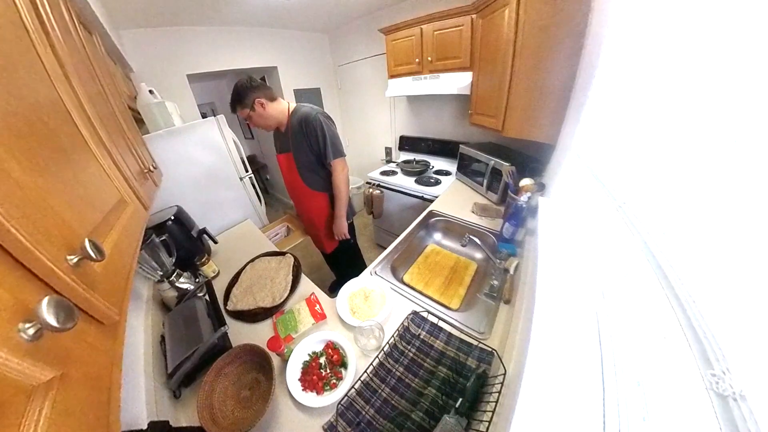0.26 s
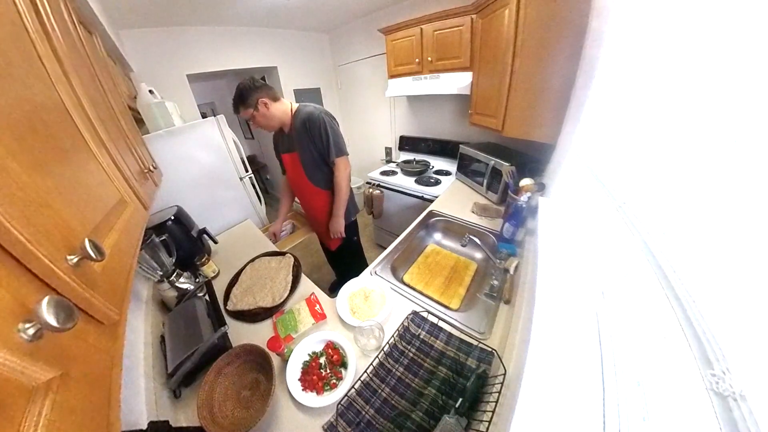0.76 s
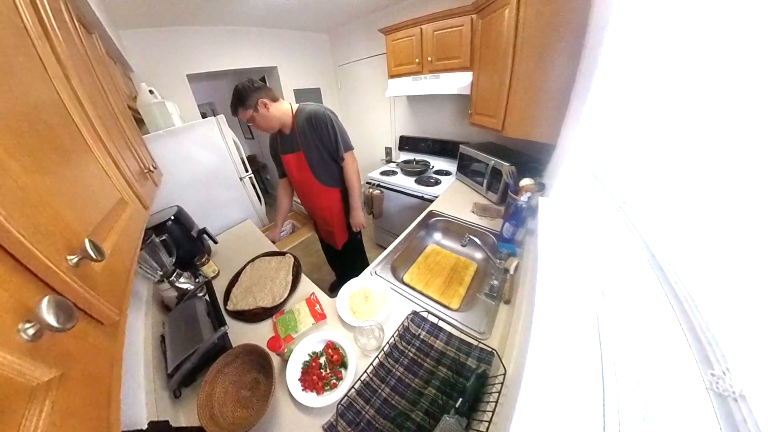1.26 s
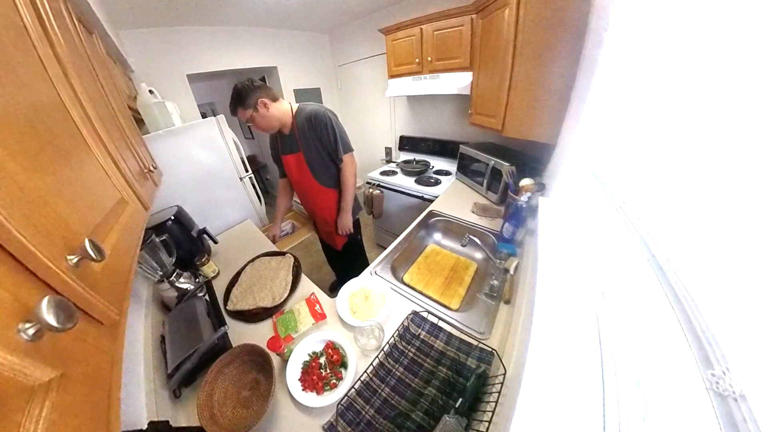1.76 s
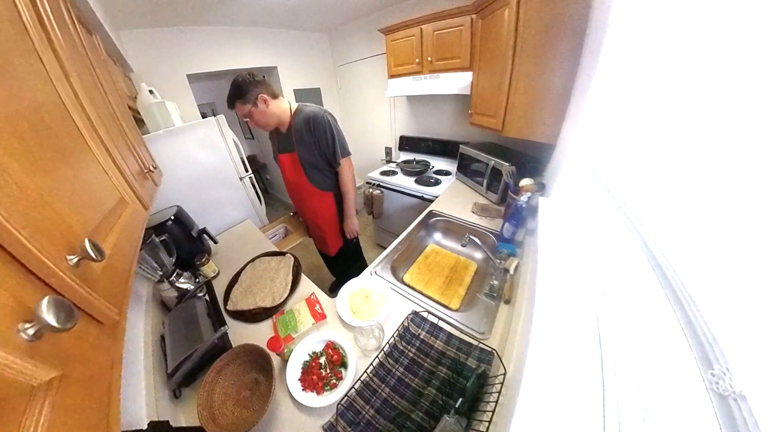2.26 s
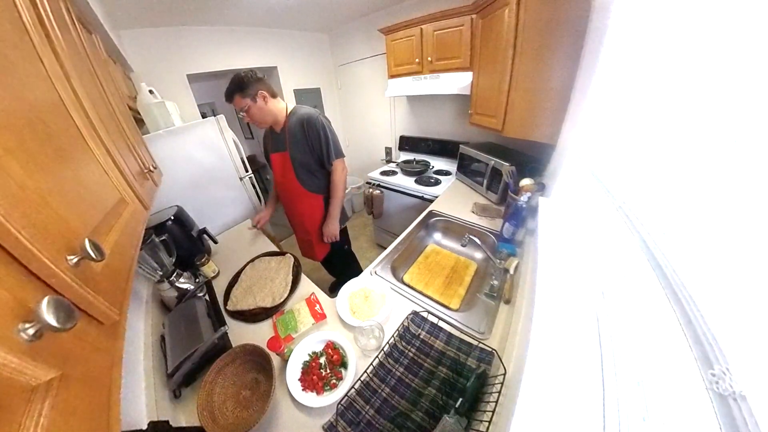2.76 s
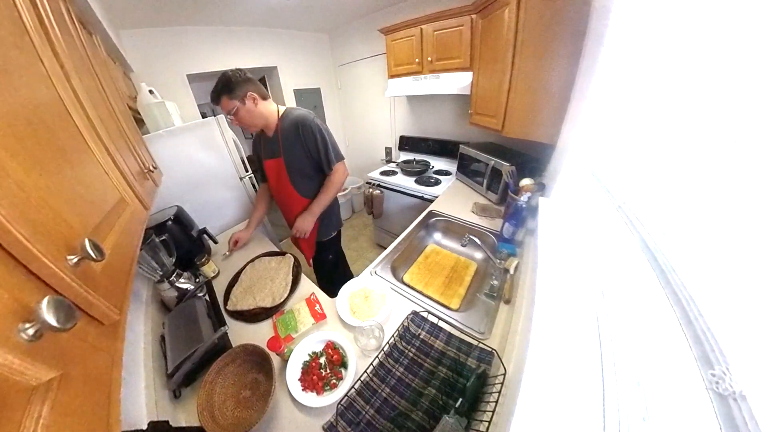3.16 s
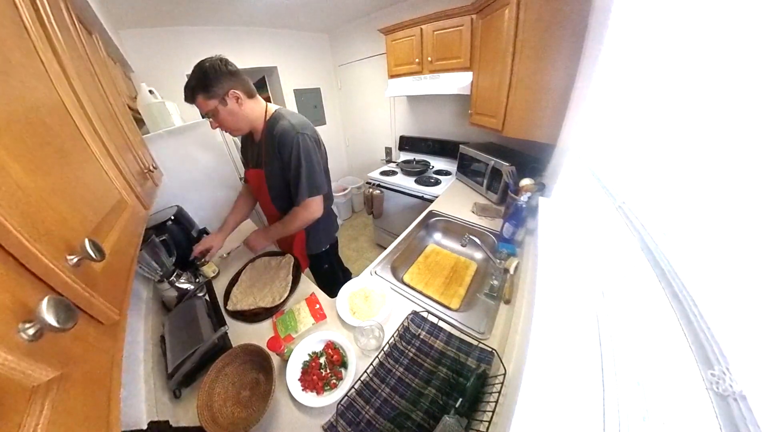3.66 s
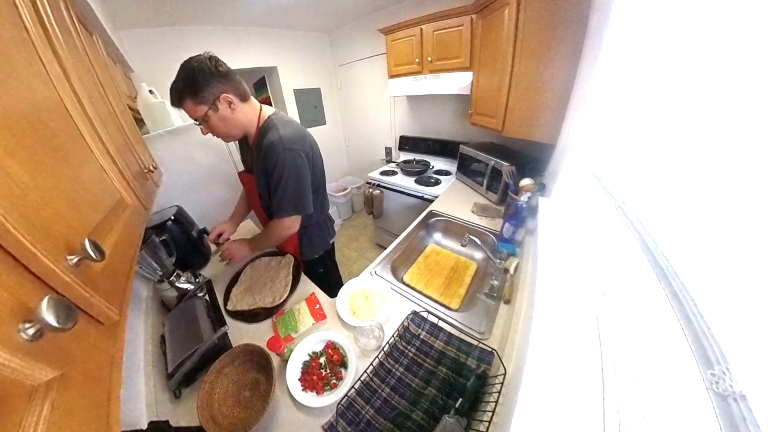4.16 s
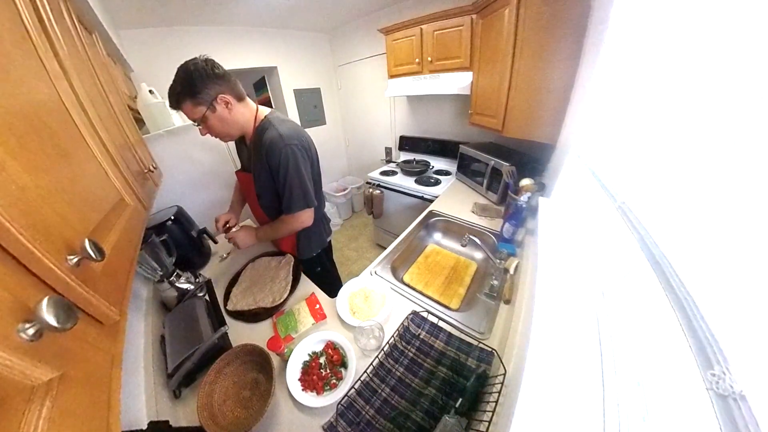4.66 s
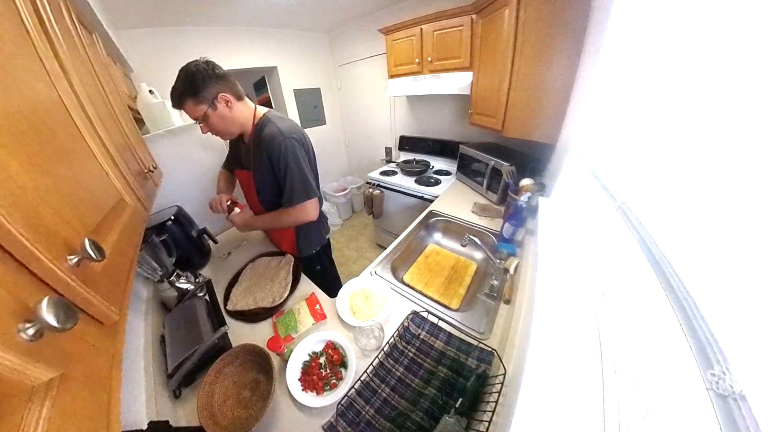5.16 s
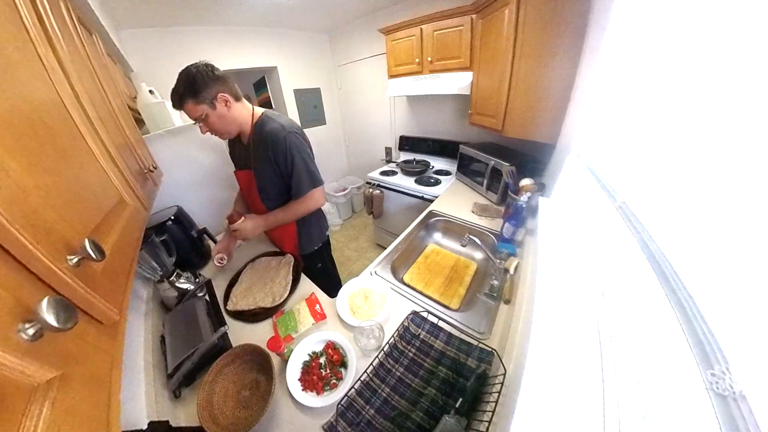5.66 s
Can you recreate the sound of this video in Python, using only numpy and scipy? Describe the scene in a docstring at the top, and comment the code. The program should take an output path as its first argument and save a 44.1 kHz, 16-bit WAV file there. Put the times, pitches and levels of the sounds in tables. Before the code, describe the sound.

Close, slightly hissy microphone in a small reflective kitchen. Quiet wood rubbing and knocks come first, then sparse bright cutlery clinks, a pause, and a second drawer slide ending in a hollow wooden thud. Straight after, a spoon hits the counter in a rapid burst of hard knocks and metallic ringing, with a thin glass note. Two dull bumps follow, then a short hollow lid pop over steady fridge hum.

```python
"""In a small hard kitchen a cutlery drawer slides, a hand picks a spoon out with a few clinks, and the drawer
slides shut with a boom. The spoon drops on the counter, where it knocks, rattles and rings, and jolts a glass jar.
The jar is lifted and its lid pops open. All along, a fridge hums over the hiss of the microphone.
Knocks and rubbing are filtered noise or clicks, ringing is fading sines, and the hum is sines of steady pitch,
all but the lowest wavering in level."""
import sys
import numpy as np
from scipy import signal
from scipy.fft import rfft, irfft, next_fast_len
from scipy.io import wavfile

SR = 44100
rng = np.random.default_rng(int(sys.argv[2]) if len(sys.argv) > 2 else 0)


def generate_wav(signal):
    """Clip the signal to [-1, 1] and save it as 16-bit WAV at the path in sys.argv[1]."""
    frames = np.transpose(np.atleast_2d(signal))
    scaled = np.clip(frames, -1, 1) * 32767
    pcm = np.round(scaled).astype(np.int16)
    wavfile.write(sys.argv[1], SR, pcm)


N = 260631   # length [samples]


def amp(db):
    """Turn decibels into a plain factor."""
    return 10 ** (np.asarray(db, float) / 20)


def rms_one(x):
    """Scale a sound to an average strength (rms) of 1."""
    return x / np.sqrt(np.mean(x ** 2) + 1e-20)


def at_hz(points, hz):
    """Read a table of (frequency, value) at any pitch, with straight lines over log frequency."""
    table_hz, values = np.array(points).T
    return np.interp(np.log(hz), np.log(table_hz), values)


def band(x, low_hz, high_hz, order=2):
    """Keep mainly the pitches between two limits."""
    sos = signal.butter(order, [low_hz, high_hz], "band", fs=SR, output="sos")
    return signal.sosfilt(sos, x + 1e-18)


def colour(x, spectrum, size=8192):
    """Causal (minimum-phase) filter with this spectrum's shape; white noise keeps its rms."""
    hz = np.maximum(np.arange(size // 2 + 1), .5) * SR / size
    log_gain = np.log(amp(at_hz(spectrum, hz)))
    # folding the cepstrum puts the response as early as it can be
    cepstrum = irfft(log_gain)
    cepstrum[1:size // 2] *= 2
    cepstrum[size // 2 + 1:] = 0
    response = irfft(np.exp(rfft(cepstrum)))
    response = response / np.sqrt(np.sum(response ** 2))
    return signal.fftconvolve(x, response)[:N]


def ring(x, hz, t60):
    """A unit click sets a sine of height 1 ringing; it falls by 60 dB in t60 seconds."""
    r, w = amp(-60 / (t60 * SR)), 2 * np.pi * hz / SR
    return signal.lfilter([0, np.sin(w)], [1, -2 * r * np.cos(w), r * r], x + 1e-18)


def grit(spread_db):
    """Dense micro-contacts of uneven size; rms 1."""
    uneven_db = spread_db * np.minimum(rng.exponential(1, N), 4)
    return rms_one(rng.standard_normal(N) * amp(uneven_db))


def contacts(seconds, db, length_s, rise_s):
    """Envelope of touches that swell over their rise and fade over their length."""
    t, out = np.arange(N) / SR, np.zeros(N)
    lengths, rises = np.clip(length_s, .0005, .1), np.clip(rise_s, .0001, .05)
    for s, gain, length, rise in zip(seconds, amp(db), lengths, rises):
        span = slice(round(s * SR), round((s + 8 * length + rise) * SR))
        age = np.maximum(t[span] - s, 0)
        out[span] += gain * (1 - np.exp(-age / rise)) * np.exp(-age / length)
    return out


def click(s, db):
    """Single-sample blows at the given times."""
    out = np.zeros(N)
    np.add.at(out, np.round(np.multiply(s, SR)).astype(int), amp(db))
    return out


def three_bands():
    """Grit as heard through the cabinet: thump, wooden middle, tick."""
    rough = grit(spread_db=1.0)
    thump = band(rough, low_hz=146, high_hz=370)
    wood = band(rough, low_hz=502, high_hz=1570, order=4)
    tick = band(rough, low_hz=2440, high_hz=5720, order=3)
    return rms_one(thump), rms_one(wood), rms_one(tick)


# the spoon lands again and again: (time [s], knock strength [dB], spoon ring strength [dB])
LANDINGS = [(3.309, -1.5, -61), (3.345, 0.5, -62.5), (3.368, 11, -28.5), (3.383, 1.5, -30),
            (3.398, -20, -33.5), (3.437, 5.5, -39), (3.46, -8, -44), (3.48, -3.5, -44.5),
            (3.501, -3.5, -48.5), (3.522, -2.5, -49), (3.55, -17, -55.5), (3.587, -28, -69)]
# chatter as the spoon rocks on the counter: (time [s], strength [dB])
ROCKING = [(3.311, -19), (3.325, -31), (3.364, -28), (3.369, -7.5), (3.374, -21), (3.502, -26),
           (3.578, -45.5)]
# tone of the counter when knocked: (frequency [Hz], relative level [dB per Hz])
COUNTER = [(40, -54), (110, -18), (250, -11.5), (430, -8.5), (950, 2), (1400, -2), (2500, -19.5),
           (3100, -20), (5000, -34), (9000, -56.5), (16000, -56.5)]
# the spoon's ringing modes: (frequency [Hz]), and in the same order (level [dB], t60 [s])
SPOON_HZ = [3101, 4032, 5452, 7330, 7957, 9600, 9760, 12960]
SPOON_MODES = [(0, 0.0582), (0.5, 0.42), (0.5, 0.16), (-11, 0.13), (-6.5, 0.23), (-5.5, 0.081), (-22, 0.1),
               (-15, 0.073)]
# the crack grows with the knock and with the ring [dB per dB]
CRACK_DB, CRACK_WITH_KNOCK, CRACK_WITH_RING = -34, 1.22, 0.36


def spoon():
    """Each landing knocks the counter, cracks and strikes the spoon's modes; as it rocks it chatters."""
    s, knock_db, ring_db = np.transpose(LANDINGS)
    when, level = np.transpose(ROCKING)
    chatter_db = np.interp(np.arange(N) / SR, when, level, left=-150, right=-150)
    chatter = grit(spread_db=4.5) * amp(chatter_db)
    knocks = colour(click(s, knock_db) + chatter, COUNTER)

    each = np.ones(len(s))
    crack_db = CRACK_DB + CRACK_WITH_KNOCK * knock_db + CRACK_WITH_RING * ring_db
    touches = contacts(s, crack_db, length_s=0.0098 * each, rise_s=.0003 * each)
    cracks = band(grit(spread_db=11.5) * touches, low_hz=2527, high_hz=14000)

    # every landing strikes the modes a little differently
    chance_db = rng.normal(0, 0.89, (len(s), len(SPOON_MODES)))
    rings = 0
    for k, (hz, (mode_db, t60)) in enumerate(zip(SPOON_HZ, SPOON_MODES)):
        rings = rings + ring(click(s, ring_db + mode_db + chance_db[:, k]), hz, t60)
    return knocks + cracks + rings


# the nearby glass jar is jolted: (time [s], level [dB])
JOLTS = [(3.368, -41), (3.437, -51), (3.585, -50)]


def jolted_jar():
    """Each jolt sets one clear note of the glass ringing."""
    return ring(click(*np.transpose(JOLTS)), hz=4420, t60=0.82)


# the drawer front meets the cabinet and bounces: (time [s], strength [dB])
SHUT = [(2.951, -23), (2.972, -21), (2.99, -27), (3.014, -39.5)]
# tone of the wooden rattle: (frequency [Hz], relative level [dB per Hz])
CABINET = [(30, -45), (100, -1.5), (300, 1.5), (560, -12.5), (950, -4), (1500, -13), (3000, -27),
           (7000, -40), (15000, -50)]
# cabinet panel modes: (frequency [Hz]), and in the same order (level [dB], t60 [s])
PANELS_HZ = [84, 205, 255, 380]
PANEL_MODES = [(-2, 0.21), (-3, 0.071), (-2, 0.084), (-6.5, 0.054)]
# the cutlery set ringing: (frequency [Hz], level [dB], t60 [s])
SHIVER = [(4600, -56.5, .2), (5160, -61, 0.16), (5450, -58, .15), (6940, -58, 0.17)]
SHIVER_S = 3.015   # when the cutlery starts to ring
SHUT_CONTACT_S, SHUT_RISE_S = 0.0098, 0.0031
SEATED_S, SEATED_DB = 2.985, -21   # the front seats fully and sets off the deepest panel


def drawer_shuts():
    """The cabinet panels boom under a wooden rattle; the cutlery shivers just after."""
    s, db = np.transpose(SHUT)
    each = np.ones(len(s))
    touches = contacts(s, db, SHUT_CONTACT_S * each, SHUT_RISE_S * each)
    rattle = colour(grit(spread_db=2.5) * touches, CABINET)

    boom = 0
    for hz, (mode_db, t60) in zip(PANELS_HZ, PANEL_MODES):
        deepest = hz == min(PANELS_HZ)
        blows = click([SEATED_S], SEATED_DB) if deepest else click(s, db)
        boom = boom + amp(mode_db) * ring(blows, hz, t60)
    boom = band(boom, low_hz=60.4, high_hz=427)   # a soft blow

    shiver = sum(ring(click([SHIVER_S], level), hz, t60) for hz, level, t60 in SHIVER)
    return rattle + boom + shiver


# cutlery clinking in the drawer:
# (time [s], clink [dB], tray knock [dB], scratch [dB], ring strength [dB], rise of the metal touch [s])
CLINKS = [(1.097, -60, -54, -59, -97, 0.0027), (1.133, -42.5, -45, -41.5, -90, 0.0026),
          (1.366, -56, -54, -53, -95, .004), (1.387, -32.5, -36.5, -45, -67, 0.0015),
          (1.534, -46, -34.5, -57, -74, 0.0041), (1.546, -26, -36, -33.5, -49.5, 0.0036),
          (1.558, -23.5, -29.5, -31.5, -52.5, 0.0053), (2.568, -49, -45, -41.5, -81, 0.00089)]
# the cutlery's common modes: (frequency [Hz]), and in the same order (level [dB], t60 [s])
CUTLERY_HZ = [3670, 4440, 5290, 6280, 7020, 8020, 9600, 11100, 12300, 12800, 13000, 13400, 14600]
CUTLERY_MODES = [(-36, .02), (-24, 0.018), (-3, 0.032), (3.5, 0.035), (-3.5, 0.094), (-3.5, 0.026),
                 (-5, 0.083), (-4, 0.056), (-13, 0.032), (0, 0.031), (4, 0.042), (-12, .05), (-1, 0.046)]
# tone of the bright clink, then of the tray below: (frequency [Hz], relative level [dB per Hz])
CLINK_TONE = [(3000, -18.5), (5500, -4.5), (7000, 4.5), (10500, -1.5), (13200, 3), (15200, 0), (16500, -34)]
TRAY_TONE = [(88, -56), (150, -31.5), (414, -14), (716, -12.5), (920, -5.5), (1290, -15), (1500, -13.5),
             (2600, -25.5), (3380, -46), (5720, -120)]
JOSTLE_S, TRAY_S = 0.015, 0.028   # fading of the touches on metal and on the tray
TRAY_SLOWER = 2.8   # the tray's rise takes this many times longer


def cutlery():
    """Forks and spoons jostle: bright grit, a duller scratch, their common modes, and the tray below."""
    s, clink_db, tray_db, scratch_db, ring_db, rise = np.transpose(CLINKS)
    length = JOSTLE_S * np.ones(len(s))
    rough = grit(spread_db=6.0)

    # every clink excites the modes a little differently
    chance_db = rng.normal(0, 1.2, (len(s), len(CUTLERY_MODES)))
    rings = 0
    for k, (hz, (mode_db, t60)) in enumerate(zip(CUTLERY_HZ, CUTLERY_MODES)):
        push = contacts(s, ring_db + mode_db + chance_db[:, k], length, rise)
        rings = rings + ring(rough * push, hz, t60)

    bright = colour(rough * contacts(s, clink_db, length, rise), CLINK_TONE)
    scratch_grit = rms_one(band(rough, low_hz=3200, high_hz=6670))
    scratch = scratch_grit * contacts(s, scratch_db, length, rise)
    tray_touches = contacts(s, tray_db, TRAY_S * np.ones(len(s)), TRAY_SLOWER * rise)
    tray = colour(grit(spread_db=0.0) * tray_touches, TRAY_TONE)
    return rings + bright + scratch + tray


# the lid lets go: (time [s], strength [dB])
POP = [(5.035, -5)]
# the lid's modes: (frequency [Hz]), and in the same order (level [dB], t60 [s])
LID_HZ = [930, 923, 956, 1740]
LID_MODES = [(0.5, 0.0094), (-23.5, 0.13), (-24.5, 0.16), (-18.5, 0.027)]
# tone of the short hiss: (frequency [Hz], relative level [dB per Hz])
SNAP = [(50, -19), (150, -12.5), (330, -29), (600, -17), (900, -18), (1400, -6.5), (1900, 1), (2450, -26.5),
        (3100, -12), (4200, -12.5), (5200, -20), (6200, -16), (6750, -25.5), (7500, -22.5), (16000, -40)]
SNAP_DB = -3   # hiss strength against the pop strength


def lid_pop():
    """Air rushes in through the neck, so the note swells over its first cycles; the lid's close modes beat."""
    (s, db), = POP
    inrush = amp(-20) * ring(click([s], db), hz=940, t60=.012)
    note = sum(amp(mode_db) * ring(inrush, hz, t60) for hz, (mode_db, t60) in zip(LID_HZ, LID_MODES))
    hiss = rng.standard_normal(N) * contacts([s], [db + SNAP_DB], length_s=[.006], rise_s=[.0008])
    return band(note, low_hz=610, high_hz=5010) + colour(hiss, SNAP)


# two slides of the drawer on its runners, each a list of:
# (time [s], wood scrape level [dB], gritty treble above the scrape [dB])
SLIDES = [
    [(0.0, -46.5, -14), (0.05, -50.5, -22), (0.116, -60.5, -6), (0.13, -52.5, -3), (0.24, -58, -18),
     (0.374, -64, -16), (0.432, -60.5, -9), (0.6, -87, -20)],
    [(2.1, -78, -8), (2.27, -70, -9), (2.472, -48, -20), (2.536, -63, -20), (2.586, -48.5, -5),
     (2.762, -56, -18), (2.94, -59, -12)],
]
RUMBLE_DB = -56.5   # at the loudest point of each scrape
RUMBLE_FOLLOWS = 0.35   # the cabinet rumbles along, taking up this share of the scrape's swing in dB


def drawer_slides():
    """Wood rubs on wood while the drawer moves."""
    thump, wood, tick = three_bands()
    t, out = np.arange(N) / SR, 0
    for rows in SLIDES:
        s, db, high_db = np.transpose(rows)
        level, high = np.interp(t, s, db), np.interp(t, s, high_db)
        moving = (t >= s[0]) * np.clip((s[-1] - t) / .03, 0, 1)   # fades out over the last 0.03 s
        scrape = amp(level) * (wood + amp(high) * tick)
        rumble = amp(RUMBLE_DB + RUMBLE_FOLLOWS * (level - db.max())) * thump
        out = out + moving * (scrape + rumble)
    return out


# small bumps of drawer, hand and jar:
# (time [s], knock strength [dB], tick above the knock [dB], weight above the knock [dB])
BUMPS = [(0.0, -48.5, -21, 11), (0.126, -37, -30, -16), (0.177, -43, -11.5, -7), (0.38, -54, -18, 3),
         (1.138, -54.5, -19, 2), (1.298, -49.5, -14, -16), (1.783, -46, -12.5, -6),
         (2.169, -54.5, -11, -14), (2.312, -51, -6, -5), (2.433, -44.5, -22, -2.5), (2.571, -38.5, -17, -9),
         (2.862, -48.5, -24, 3), (3.814, -50.5, -42, 13), (3.874, -48.5, -30, 13)]
BUMP_CONTACT_S, BUMP_RISE_S = 0.02, 0.0043
THUMP_UNDER_DB = -5.5   # thump against the deep boom


def bumps():
    """Each bump shakes the wood and ticks; the more weight it has, the more it thumps and booms."""
    thump, wood, tick = three_bands()
    boom = rms_one(band(rng.standard_normal(N), low_hz=105.4, high_hz=135.6))
    s, db, tick_db, weight_db = np.transpose(BUMPS)
    each = np.ones(len(s))
    layers = [(wood, 0), (thump, weight_db + THUMP_UNDER_DB), (tick, tick_db), (boom, weight_db)]
    out = 0
    for layer, rel_db in layers:
        out = out + layer * contacts(s, db + rel_db, BUMP_CONTACT_S * each, BUMP_RISE_S * each)
    return out


# how fast the echoes die away: (frequency [Hz], t60 [s])
KITCHEN = [(100, .2), (300, 0.33), (1000, 0.29), (3000, 0.3), (6000, 0.26), (14000, 0.17)]
# single echoes off near cupboards: (delay [ms])
EARLY_MS = [2.3, 4.1, 6.7, 9.2, 11.9]
# echoes circling between the walls: (time for one round [ms])
ROUNDS_MS = [14.9, 17.9, 20.3, 22.9, 26.1, 29.3, 32.7, 36.1, 38.3, 40.7, 44.3, 48.9, 53.1, 57.7]
# smearing by rough surfaces: (delay [ms])
SCATTER_MS = [1.3, 2.9, 5.3]
CIRCLING_DB, EARLY_DB = 0.07, -13   # circling paths taken together, and each single echo


def kitchen(x):
    """Direct sound, single echoes off near cupboards, and echoes that circle between the walls losing treble."""
    size = next_fast_len(N + SR)
    hz = np.maximum(np.arange(size // 2 + 1), 1) * SR / size

    def late(ms):
        """A delay, written as a turn of phase at each frequency."""
        return np.exp(-2j * np.pi * hz * ms / 1000)

    echoes = amp(EARLY_DB) * sum((-1) ** k * late(ms) for k, ms in enumerate(EARLY_MS))
    share = amp(CIRCLING_DB) / np.sqrt(len(ROUNDS_MS))
    for k, ms in enumerate(ROUNDS_MS):
        once = amp(-60 * ms / 1000 / at_hz(KITCHEN, hz)) * late(ms)
        echoes = echoes + share * (-1) ** k * once / (1 - once)   # the sum of endless rounds
    for ms in SCATTER_MS:   # rough surfaces smear every echo
        echoes = echoes * (late(ms) - .6) / (1 - .6 * late(ms))
    return x + irfft(rfft(x, size) * echoes, size)[:N]


# lines of the fridge hum: (frequency [Hz], rms level before wavering [dB])
HUM = [(59.2, -55.5), (118.4, -68.5), (414.5, -58.5), (586.8, -72), (705.2, -80.5), (839.8, -75),
       (958.2, -79)]
HUM_WAVER_DB = 2   # rms swing in level


def fridge():
    """Motor lines of steady pitch; all but the lowest waver in level."""
    t, out = np.arange(N) / SR, 0
    for k, (hz, db) in enumerate(HUM):
        # one point per 100 samples, so these limits become 1 to 15 Hz once stretched
        waver = rms_one(band(rng.standard_normal(N // 100 + 1), 100, 1500))
        stretched = np.interp(np.arange(N) / 100, np.arange(len(waver)), waver)
        waver_db = HUM_WAVER_DB * (k > 0) * stretched
        out = out + np.sqrt(2) * amp(db + waver_db) * np.sin(2 * np.pi * (hz * t + rng.random()))
    return out


# tone of the microphone hiss: (frequency [Hz], relative level [dB per Hz])
FLOOR = [(20, -18), (45, -19), (85, -32.5), (120, -3), (150, -19), (220, -11), (350, -8), (410, -12),
         (470, -14), (1160, -15), (1600, -24), (2500, -28.5), (13500, -32), (16000, -26.5)]
FLOOR_DB = -58   # rms level


def microphone_hiss():
    """Steady random noise, shaped by its tone table."""
    return amp(FLOOR_DB) * colour(rng.standard_normal(N), FLOOR)


def scene():
    """Everything handled echoes in the kitchen; the hum and the hiss are added without echo."""
    handled = spoon() + jolted_jar() + drawer_shuts() + cutlery() + lid_pop() + drawer_slides() + bumps()
    return (kitchen(handled) + fridge() + microphone_hiss())[None]


CUTOFF_HZ = 15550   # from here up the treble is at least 70 dB down


def record(dry):
    """Peaks are rounded, the top is cut."""
    rounded = 1.6 * np.tanh(dry / 1.6)
    return signal.sosfilt(signal.cheby2(24, 70, CUTOFF_HZ, fs=SR, output="sos"), rounded)


dry = scene()
out = record(dry)
generate_wav(out)
```